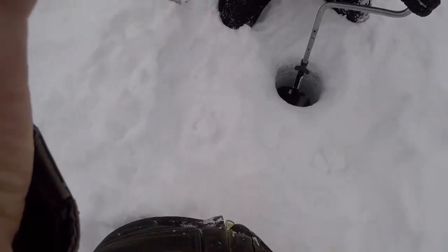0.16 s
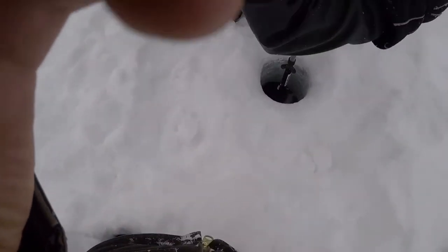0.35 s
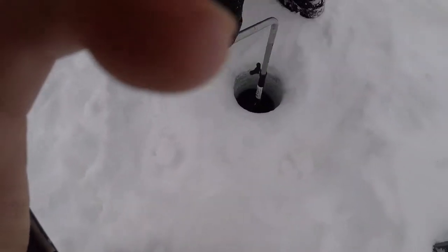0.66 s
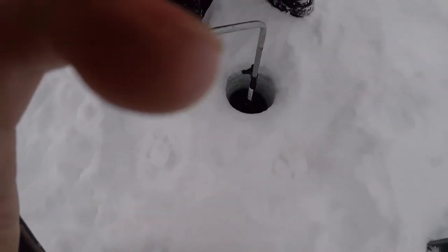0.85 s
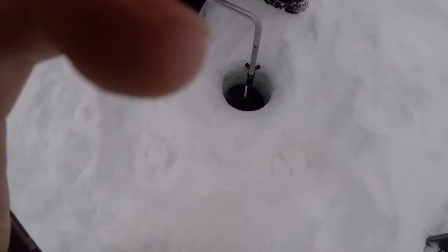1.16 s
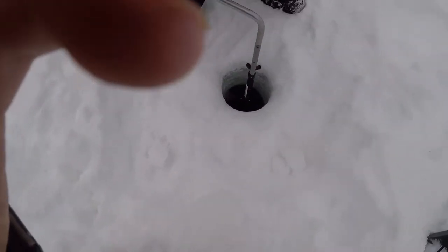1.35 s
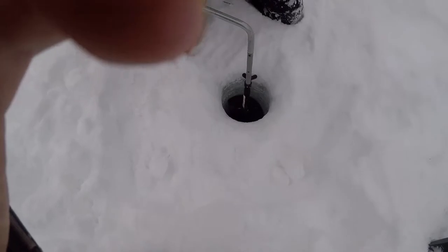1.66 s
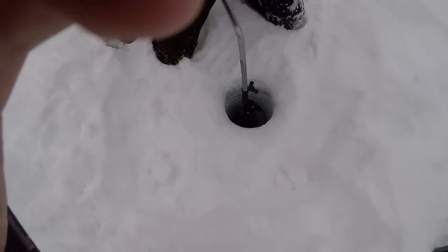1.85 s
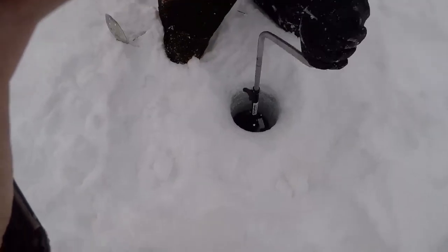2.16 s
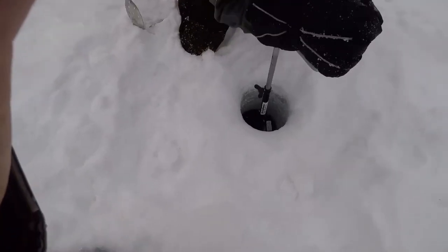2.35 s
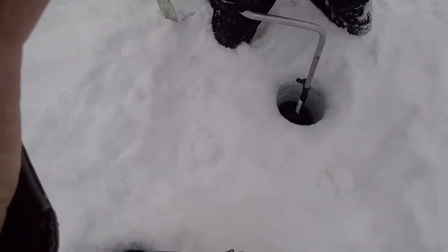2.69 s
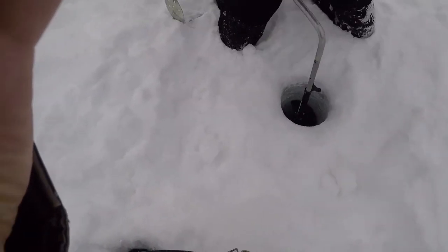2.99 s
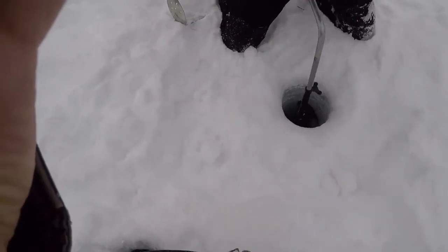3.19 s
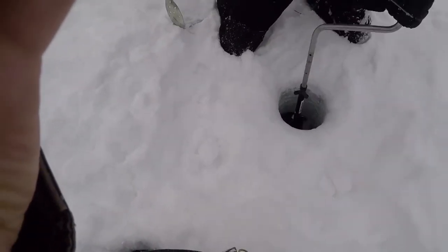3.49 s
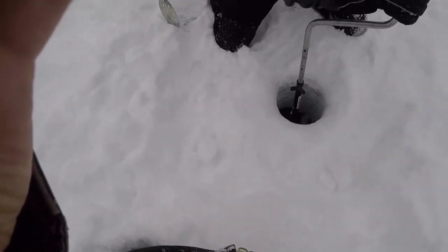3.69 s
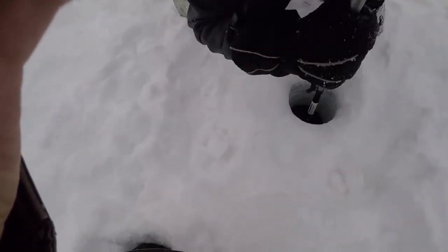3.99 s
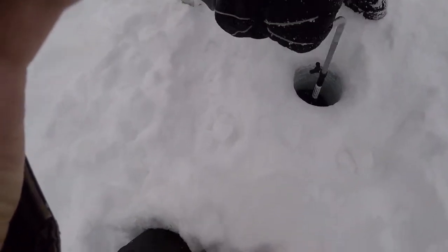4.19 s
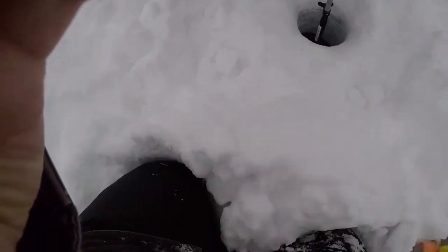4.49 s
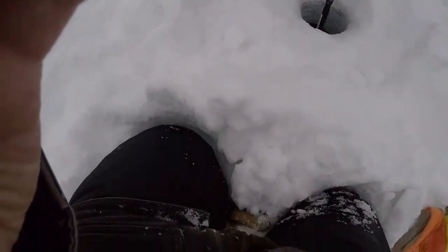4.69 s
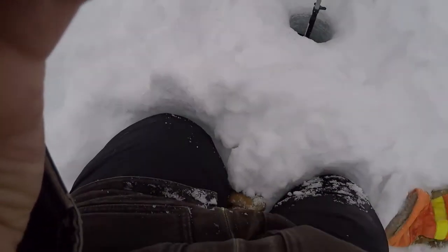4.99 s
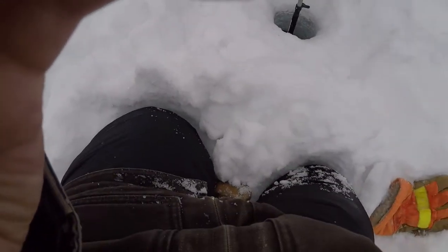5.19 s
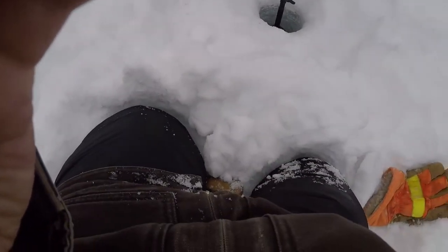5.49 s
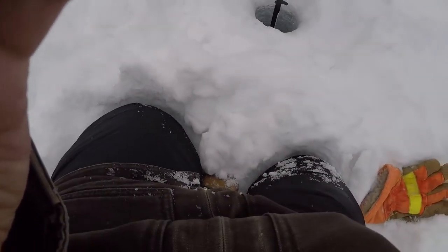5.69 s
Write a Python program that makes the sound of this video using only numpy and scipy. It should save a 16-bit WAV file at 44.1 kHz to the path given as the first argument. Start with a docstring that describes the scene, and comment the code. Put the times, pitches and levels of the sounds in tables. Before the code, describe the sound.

In open snow, a hand auger cuts lake ice a metre or two from a hand-held stereo microphone, slightly left of centre. A wind puff and dull handling bump come at 0.2 s, then a gritty rasp from 0.35 to 0.63 and a shorter one at 0.8. Small scratches and a dry crank snap follow near 1.2, with a faint sleeve swish at 1.4. A sharp bite at 1.73 starts two joined scrapes lasting to 2.17; more come at 2.4 to 2.67, 2.85, and a longer one at 3.13 to 3.48. Strong rasps follow at 3.73 and 4.15, with a low wind gust at 4.33 and ticks around 4.5. A short crunch at 4.6, a soft bump and brief scratch near 5.05, then a last long scrape at 5.4, fading toward 5.75. Each stroke mixes dull icy thud, coarse crackling grind and short steely ring over faint hiss; a soft bump ends it.

```python
"""Hand auger in lake ice

A hand auger is cranked through lake ice, a metre or two from a hand-held camera, in open snow.
At each push the blades bite and shave off a dense run of tiny fractures: filtered impulsive noise
that shakes the ice, sounds the hole and rings the steel shaft through banks of resonators.
Between pushes the crank snaps lightly and sleeves swish, both as short bursts of coloured noise;
soft bumps, wind rumble and a faint hiss are coloured noise under slow level curves."""
import sys
import numpy as np
from scipy import signal
from scipy.fft import rfft, irfft
from scipy.io import wavfile
from scipy.ndimage import uniform_filter1d

SR = 44100
rng = np.random.default_rng(int(sys.argv[2]) if len(sys.argv) > 2 else 0)


def unload_wav(signal):
    """Save mono or channel-first audio to the path in sys.argv[1] as 16-bit WAV at rate SR, clipped to [-1, 1]."""
    wavfile.write(
        sys.argv[1],
        SR,
        np.round(np.clip(np.atleast_2d(signal).T, -1, 1) * 32767).astype(np.int16),
    )


N = 257984
TIME = np.arange(N) / SR  # s
FREQ = np.maximum(np.arange(N // 2 + 1) * SR / N, 1)  # Hz
SIDES = np.array([[1], [-1]])  # opposite signs at the left and right ports

# Pushes on the crank, each one cut of the blades: catch_s, let_go_s, rasp_db, build_up_db, sag_db, run_out_s,
# thud_db of the ice, ring_db of the steel, hiss_db of the shavings (these three relative to the rasp),
# dulling_db along the push, hole_hz and shaft_hz (favoured pitches); levels precede the balance in cracks()
CRANK_PUSHES = [ (0.336, 0.629, -22, 1.3, -1, 0.019, 0.5, -1, -2, -0.5, 463, 4700),
                (0.793, 0.94, -20.5, 5.6, 1.5, 0.024, 1.5, 3, -1, 2, 500, 6560),
                (1.728, 1.85, -19.5, 6, 7, 0.007, 3.5, 3, 1.5, -8.5, 846, 2350),
                (1.874, 2.166, -24, 11.7, 0, 0.019, -3, 2.5, 2.5, 9.5, 673, 1510),
                (2.382, 2.531, -26, 3.6, -3, .018, 3, -3, -5.5, 0.5, 1020, 7000),
                (2.518, 2.674, -21, 5.7, 2, .018, 2.5, 2, 1.5, 6, 290, 3420),
                (2.844, 2.991, -21.5, 1.5, 3, 0.022, 4.5, 0.5, 0, -2.5, 890, 3280),
                (3.13, 3.477, -20, 3.2, 7.5, 0.012, 1.5, 0, 0, -2, 713, 3220),
                (3.729, 3.997, -19, 6.3, 5.5, 0.015, 0, -5, -1, 1, 358, 2210),
                (4.145, 4.319, -18.5, 6.1, 3.5, 0.0095, 4, -1, 0, -3.5, 223, 2870),
                (4.597, 4.684, -19.5, 0.44, 6.5, 0.012, 7, -1, -2.5, -6.5, 202, 2930),
                (5.07, 5.102, -24.5, 1.1, 5, 0.037, 6.5, -2, -2, -4, 610, 1540),
                (5.399, 5.752, -20, 4.6, 11, 0.0062, 1.5, -1.5, -1, -2, 103, 5180), ]


def undb(db):
    """Logarithmic level: decibels to an amplitude gain."""
    return 10 ** (np.asarray(db) / 20)


def over_freq(points):
    """Spectral envelope: (Hz, value) points joined on a log-frequency axis."""
    hz, value = np.transpose(points)
    return np.interp(np.log(FREQ), np.log(hz), value)


def unit(x):
    """Normalization to an rms amplitude of 1."""
    return x / np.sqrt(np.mean(x ** 2))


def walk(rate_hz):
    """Random modulation: levels held for 1 / rate_hz and smoothed over as long, rms 1."""
    hold = max(int(SR / rate_hz), 1)
    steps = rng.standard_normal(N)[np.arange(N) // hold]
    return unit(uniform_filter1d(steps, hold))


def noise(points):
    """Spectral shaping: white noise filtered to a given colour, rms 1."""
    white = rfft(rng.standard_normal(N))
    return unit(irfft(white * undb(over_freq(points)), N))


def resonate(x, hz, width_hz):
    """Resonance: one mode as a band-pass with gain 1 at its centre."""
    return signal.lfilter(*signal.iirpeak(hz, hz / width_hz, fs=SR), x)


def below(hz, order=8):
    """Crossover: the share of amplitude passed below a frequency, one half at that frequency."""
    return 1 / (1 + (FREQ / hz) ** order)


def auger():
    """Source and resonator: cutting forces excite ice and steel, and level difference places the sound sideways."""
    # where the hole lies as the camera turns: time_s, left_minus_right_db
    aim = [(0.6, 2.5), (2.2, 1.4), (3.5, 0.2), (4.4, 1), (5.3, 3.5)]
    force = np.hypot(pushes(), bites())
    direct = body(spiral(cracks(force))) + ticks()
    scattered = cracks(force)
    pan_db = np.interp(TIME, *np.transpose(aim))
    return ports(direct, scattered) * undb([pan_db / 2, -pan_db / 2])


def pushes(attack_s=0.0085, graze=0.07, graze_s=0.02, thud_lag_s=0.017, rasp_lag_s=0.0086, thud_linger=1.16,
           build_power=2.8, sag_power=3, follow=(0.8, 0.9, 1.2, 1.2)):
    """Force envelope: blades graze, catch, build up, sag and run out, the treble first.

    Rows are thud, rasp, ring and hiss; follow is how closely each keeps to the effort.
    """
    force = np.zeros((4, N))
    for start, end, db, build, sag, run_out, thud, ring, hiss, dulling, *_ in CRANK_PUSHES:
        along = np.clip((TIME - start) / (end - start), 0, 1)  # 0 at the catch, 1 at the let-go
        effort_db = -build * (1 - along) ** build_power - sag * along ** sag_power
        tilt_db = dulling * (along - 0.5)

        grazing = graze * np.exp(-np.clip(start - TIME, 0, 1) / graze_s)
        catch = np.maximum(np.clip((TIME - start) / attack_s + 0.5, 0, 1), grazing)

        colours_db = (thud + tilt_db, 0, ring - tilt_db, hiss - tilt_db)
        lags_s = (thud_lag_s, rasp_lag_s, 0, 0)
        releases_s = (run_out * thud_linger, run_out, run_out, run_out)
        for k, (colour_db, share, lag, release) in enumerate(zip(colours_db, follow, lags_s, releases_s)):
            gate = catch * np.exp(-np.clip(TIME - end - lag, 0, 1) / release)
            strength = gate * undb(db + share * effort_db + colour_db)
            force[k] = np.maximum(force[k], strength)
    return force


def bites(rise_s=0.0028, fall_s=0.0055, bite_db=-6.5):
    """Transient excitation: as a blade digs in or the crank knocks, force rises and decays exponentially."""
    # short bites of the blades and knocks of the crank: time_s, rasp_db (before bite_db),
    # thud_db, treble_db (both relative to the rasp; treble is ring and hiss)
    digs = [(0.21, -26.5, 1, 3.5), (0.771, -6.5, -7, -11), (0.799, -22, 22, 12), (0.984, -12, -10, -4.5),
            (1.03, -22.5, 17, -6), (1.226, -34.5, 5, 7), (1.267, -16, 2.5, -10), (1.466, -8.5, -10, -10.5),
            (1.48, -14, 6.5, -9.5), (1.688, -23.5, 9, -1), (1.733, 0, -6, -11), (1.842, -10.5, 12.5, -11),
            (1.881, -0.5, 4, -14.5), (2.384, -4, -6, -15), (2.727, -17.5, 8, -17), (2.845, -28, -4, -10),
            (3.035, -10.5, -15, -8.5), (3.128, -8, -15, -0.5), (3.732, -7.5, -10, -3.5),
            (4.025, -7, 15, -7.5), (4.599, -2.5, -6, -4.5), (5.095, -3, 4, -25), (5.159, -13.5, 11, -8.5),
            (5.351, -14, 10.5, -14), (5.403, 0, -2, -8.5)]
    force = np.zeros((4, N))
    for s, db, thud, treble in digs:
        age = np.clip(TIME - s + rise_s, 0, fall_s * 20)
        burst = (1 - np.exp(-age / rise_s)) * np.exp(-age / fall_s)
        levels_db = db + bite_db + np.array([thud, 0, treble, treble])
        force += np.outer(undb(levels_db), burst)
    return force


def cracks(force, thud_db=-6.5, rasp_db=-5, ring_db=-6.0, hiss_db=-6.0):
    """Band-wise excitation: the same fractures shake the ice sheet, sound the hole, strike the shaft and hiss."""
    # broad colour of the cut: freq_hz, level_db (relative, per Hz)
    cut = [(65, -22), (105, -2), (220, -2.5), (355, -10), (700, -7), (1200, -8), (1900, -13.5), (2600, -7),
           (4400, -12.5), (6300, -15.5), (8100, -27), (10200, -29), (11700, -44), (14500, -46)]
    breaks = fractures()
    # thud, rasp, ring and hiss split at 314, 1756 and 4610 Hz
    edges = [0 * FREQ, below(314), below(1756), below(4610), np.ones_like(FREQ)]
    registers = np.diff(edges, axis=0)
    spectrum = 0
    for strength, register, db in zip(force, registers, (thud_db, rasp_db, ring_db, hiss_db)):
        colour = undb(over_freq(cut)) * register
        colour = colour / np.sqrt(np.mean(abs(colour) ** 2))
        spectrum = spectrum + undb(db) * rfft(breaks * strength) * colour
    return irfft(spectrum, N)


def fractures(per_s=9000, spread_db=2.5, chatter_hz=240, chatter_db=0.15, judder_hz=60, judder_db=1.54,
              powder=0.66):
    """Random impulses: dense tiny breaks over a hiss of powder, bunched as the edge sticks and slips."""
    sizes_db = spread_db * np.minimum(rng.exponential(size=N), 4)
    impulses = undb(sizes_db) * rng.choice([-1, 1], N)
    happens = rng.random(N) < per_s / SR
    breaks = unit(impulses * happens) + powder * rng.standard_normal(N)
    stick_slip_db = chatter_db * walk(chatter_hz) + judder_db * walk(judder_hz)
    return unit(breaks * undb(stick_slip_db))


def spiral(x, ring_s=0.0054, ring_db=-7, turns_per_s=0.546, lowest_hz=1000):
    """Dense modes: the steel spiral rings as brief decaying noise, two mixes trading places as it turns."""
    angle = 2 * np.pi * turns_per_s * TIME
    ring = 0
    for facing in (np.cos(angle), np.sin(angle)):
        tail = rng.standard_normal(N) * np.exp(-np.minimum(TIME / ring_s, 50))
        tail = tail / np.sqrt(np.sum(tail ** 2))
        ring = ring + rfft(x * facing) * rfft(tail)  # convolution
    return x + undb(ring_db) * irfft(ring * (1 - below(lowest_hz)), N)


def body(crack, wander_db=-0.3, wander_hz=7):
    """Modal resonance: ice, hole and shaft ring, fed unevenly as the blades move round; each push favours two."""
    # resonances of the ice, the hole and the steel shaft: freq_hz, width_hz, lift_db
    modes = [(109, 19, 7.0), (192, 18, 3.5), (295, 35, 7.5), (407, 35, 4.0), (478, 28, 11.5),
             (631, 57, 7.5), (791, 55, 4.0), (931, 33, 7.0), (1098, 33, 2.0), (1248, 67, 3.0),
             (1549, 82, 6.0), (1839, 39, 6.0), (2110, 50, 6.5), (2361, 87, 5.0), (2443, 46, 8.0),
             (2761, 58, 4.0), (2917, 62, 4.5), (3142, 80, 8.0), (3262, 64, 3.5), (3360, 71, 7.5),
             (3744, 37, 3.5), (3885, 38, 6.0), (4089, 55, 7.0), (4341, 57, 6.5), (4802, 263, 4.0),
             (5443, 197, 4.5), (5996, 50, 3.5), (6182, 36, 3.5), (6370, 45, 7.0), (7480, 234, 4.5)]
    favour_db, favour_q = (7, 7.5), (8.6, 26)  # lift and sharpness: (hole, shaft)
    out = crack
    for hz, width_hz, lift_db in modes:
        fed = crack * undb(wander_db * walk(wander_hz))
        out = out + (undb(lift_db) - 1) * resonate(fed, hz, width_hz)
    for start, end, *_, hole_hz, shaft_hz in CRANK_PUSHES:
        during = 1.0 * (TIME > start) * (TIME < end + 0.05)
        held = uniform_filter1d(during, size=400)
        for hz, db, q in zip((hole_hz, shaft_hz), favour_db, favour_q):
            out = out + (undb(db) - 1) * resonate(out * held, hz, hz / q)
    return out


def ticks(ring_s=0.0012, width_hz=2600, tick_db=-2.5):
    """Impact: play in the crank joint closes with a small, dry, exponentially decaying snap."""
    # dry ticks of the crank joint: start_s, peak_db (before tick_db), pitch_hz
    snaps = [(1.172, -27.5, 3200), (1.5653, -33, 5430), (1.673, -23.5, 1520), (4.126, -20, 1680),
             (4.466, -19.5, 1360), (4.533, -24, 1350)]
    out, age = np.zeros(N), TIME[:600]
    for s, db, hz in snaps:
        snap = rng.standard_normal(len(age)) * np.exp(-age / ring_s)
        snap = resonate(resonate(snap, hz, width_hz), hz, width_hz)
        start = int(s * SR)
        out[start:start + len(age)] += snap / abs(snap).max() * undb(db + tick_db)
    return out


def ports(direct, scattered):
    """Interaural-like cues: two ports half cupped by a hand differ in level and phase; scatter widens them."""
    # level at the two microphone ports: freq_hz, left_minus_right_db
    balance = [(60, -0.5), (200, 3.5), (470, 8), (650, 3.5), (900, -4.5), (1400, -9.5), (1900, -3),
               (3600, -4), (5400, 2), (6700, 3), (8500, -4.5), (13000, -1)]
    # phase at the two ports: freq_hz, left_lead_rad
    phase = [(60, .1), (280, .1), (480, -.55), (700, -1.35), (1300, -1.05), (1650, 0), (4500, -.1),
             (7500, -.5), (13000, -.2)]
    # sound scattered by snow and bodies, opposite in sign at the ports: freq_hz, gain_db
    scatter = [(100, -14), (800, -13), (1450, -8), (2000, -7.5), (4000, -11.5), (7000, -3.5), (12000, -7)]
    half = undb(over_freq(balance) / 2) * np.exp(0.5j * over_freq(phase))
    pair = np.array([half, 1 / half])
    pair = pair / abs(pair.mean(axis=0))  # their mean keeps the colour of the direct sound
    side = rfft(scattered) * undb(over_freq(scatter)) * SIDES
    return irfft(rfft(direct) * pair + side, N)


def sleeves(zip_hz=3950, zip_width_hz=450, zip_db=5, width=0.28, sleeve_db=-4.0):
    """Friction noise: jacket cloth slides over itself as the arm comes round; its weave gives a faint zip."""
    # swishes of a sleeve: middle_s, half_length_s (to 1/e), level_db (before sleeve_db)
    swishes = [(1.41, 0.05, -38.5), (2.333, 0.076, -44.5), (5.016, 0.062, -40), (5.202, 0.057, -40)]
    # colour of the cloth: freq_hz, level_db (relative, per Hz)
    weave = [(240, -41), (400, -11), (520, -28), (576, -22), (676, -2), (1110, 0), (3500, -9), (3820, -3),
             (5500, -1), (13000, -37)]
    cloth = noise(weave) + width * noise(weave) * SIDES
    cloth = cloth + (undb(zip_db) - 1) * resonate(cloth, zip_hz, zip_width_hz)
    strength = 0
    for s, half, db in swishes:
        swish = np.exp(-np.minimum(((TIME - s) / half) ** 2, 20))
        strength = strength + undb(db + sleeve_db) * swish
    return cloth * strength


def air(air_db=3.5, flicker_db=2.5, width=0.81, hollow_hz=1520, hollow_width_hz=260, hollow_db=3.5):
    """Broadband ambience: a soft hiss over the open lake, with a resonance under the cupped hand."""
    # colour of the background: freq_hz, level_db (relative, per Hz)
    colour = [(88, -40), (150, -40), (225, 0.5), (364, -9.5), (648, -11.5), (727, -10), (1030, -11.5),
              (1180, -13), (1480, -13.5), (2020, -16.5), (2260, -18), (6520, -19), (12100, -36.5),
              (14900, -50)]
    # level of the background: time_s, level_db (before air_db)
    swell = [(0.1, -52), (0.7, -50), (1.1, -56), (1.3, -50), (1.6, -53), (2.3, -53.5), (3.05, -55.5),
             (3.6, -51), (4.45, -48.5), (4.85, -51), (5.3, -49), (5.82, -49)]
    hiss = noise(colour) + width * noise(colour) * SIDES
    hiss = hiss + (undb(hollow_db) - 1) * resonate(hiss, hollow_hz, hollow_width_hz)
    swell_db = np.interp(TIME, *np.transpose(swell))
    return hiss * undb(air_db + swell_db + flicker_db * walk(50))


def bumps(bump_db=2.5):
    """Structure-borne sound: dull handling thumps swell and die away exponentially, alike at both ports."""
    # soft bumps as the holder of the camera shifts in the snow: peak_s, level_db (before bump_db), rise_s, fall_s
    shifts = [(0.205, -23, 0.014, 0.0082), (5.01, -27, 0.038, 0.023), (5.822, -28, 0.013, 0.023)]
    # colour of the bumps: freq_hz, level_db (relative, per Hz)
    colour = [(40, 2), (75, 24.5), (130, 7), (320, 3.5), (480, -31), (1500, -50)]
    strength = 0
    for s, db, rise, fall in shifts:
        distance = np.maximum((s - TIME) / rise, (TIME - s) / fall)
        strength = strength + undb(db) * np.exp(-np.minimum(distance, 20))
    return noise(colour) * strength * undb(bump_db)


def wind(wind_db=3.0, buffet_db=-0.8, left_db=1.4, width=0.19):
    """Turbulent pressure: low gusts buffet the camera, nearly alike at both ports."""
    # colour of the wind on the microphone: freq_hz, level_db (relative, per Hz)
    colour = [(14, 4), (26, -2.5), (40, 3), (65, -7), (110, -16.5), (200, -22.5), (400, -48), (1000, -78)]
    # strength of the wind: time_s, level_db (before wind_db)
    gusts = [(0.0, -30.5), (0.08, -38), (0.18, -24.5), (0.24, -34), (1.81, -41), (1.84, -46), (2.31, -31),
             (2.51, -37), (4.27, -31), (4.33, -20.5), (4.42, -31.5), (4.61, -30), (4.71, -34), (4.84, -32),
             (5.25, -33.5), (5.85, -38)]
    rumble = noise(colour) + width * noise(colour) * SIDES
    gust_db = np.interp(TIME, *np.transpose(gusts))
    # left_db raises the left port and lowers the right
    return rumble * undb(gust_db + wind_db + left_db * SIDES + buffet_db * walk(12))


def scene():
    """Superposition: the auger, the sleeves and the open air add linearly."""
    return auger() + sleeves() + air() + bumps() + wind()


def record(dry, top_hz=14200):
    """Band limiting: peaks are clipped at full scale, then a steep low-pass cuts the top."""
    low_pass = signal.ellip(8, 0.2, 70, top_hz, fs=SR, output="sos")
    return signal.sosfilt(low_pass, np.clip(dry, -1, 1))


dry = scene()
out = record(dry)
unload_wav(out)
```